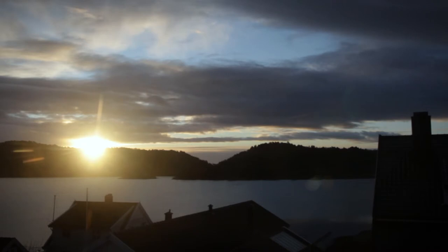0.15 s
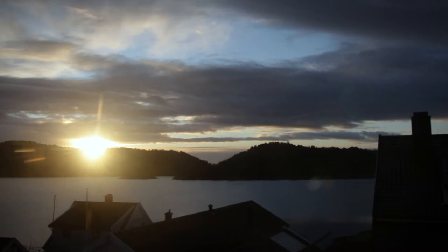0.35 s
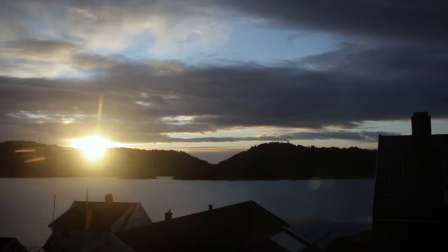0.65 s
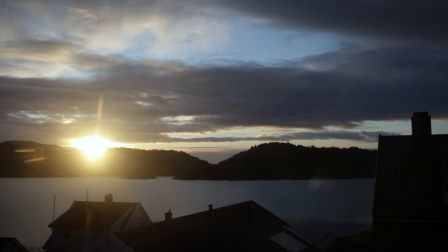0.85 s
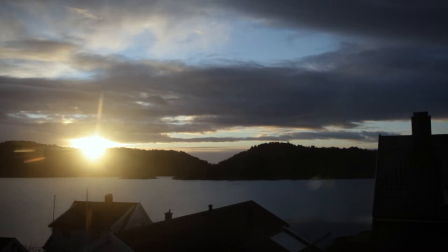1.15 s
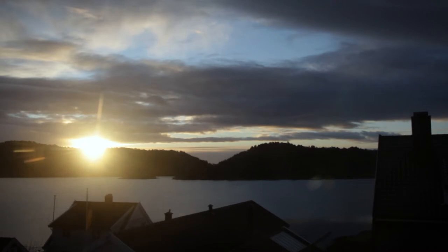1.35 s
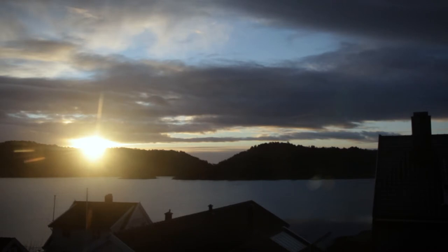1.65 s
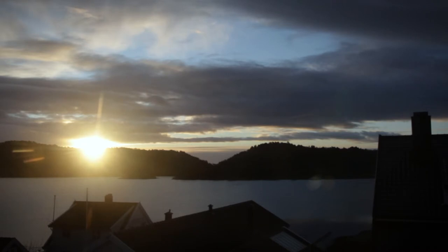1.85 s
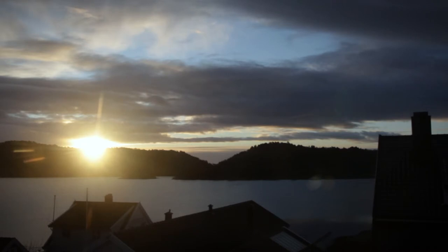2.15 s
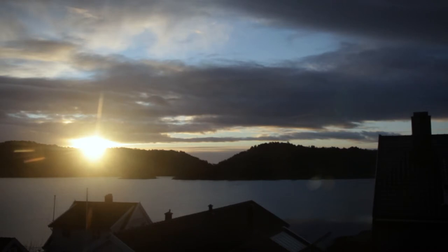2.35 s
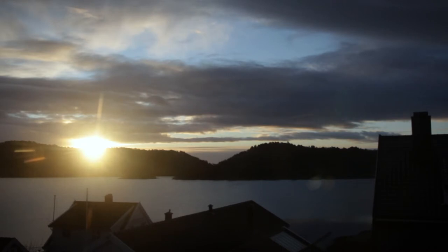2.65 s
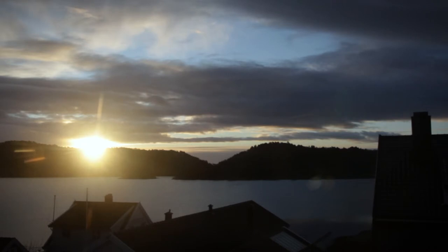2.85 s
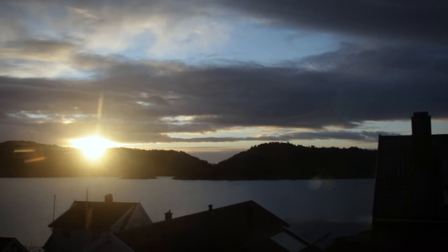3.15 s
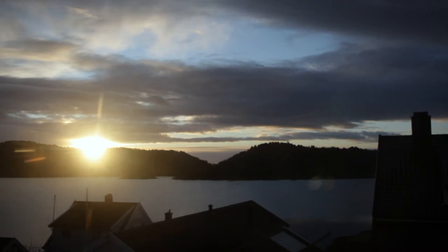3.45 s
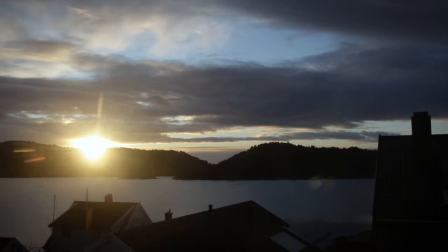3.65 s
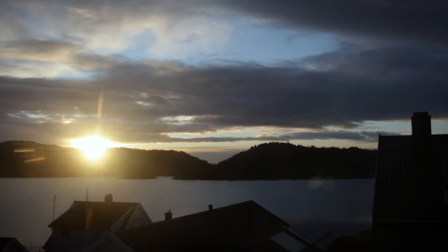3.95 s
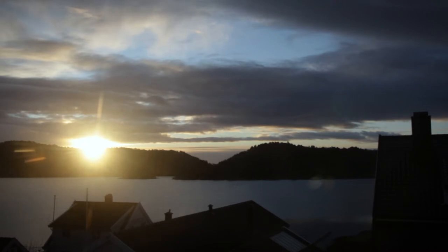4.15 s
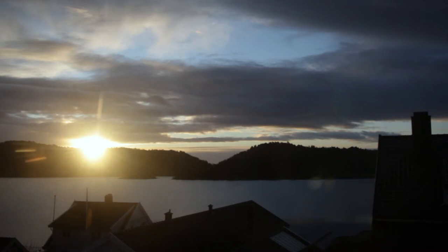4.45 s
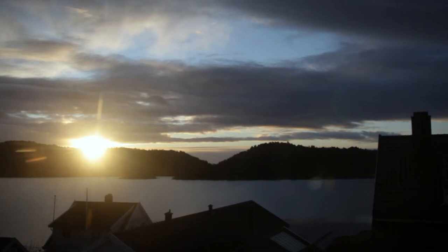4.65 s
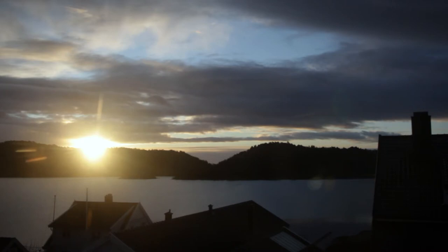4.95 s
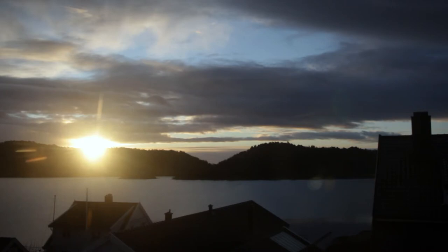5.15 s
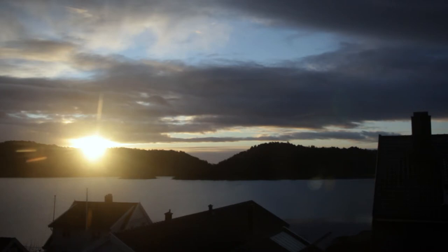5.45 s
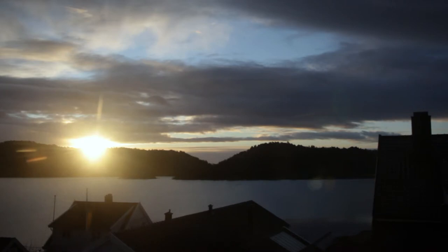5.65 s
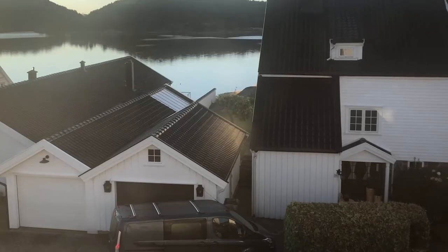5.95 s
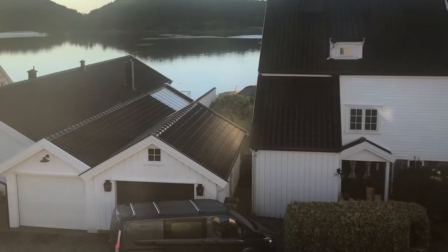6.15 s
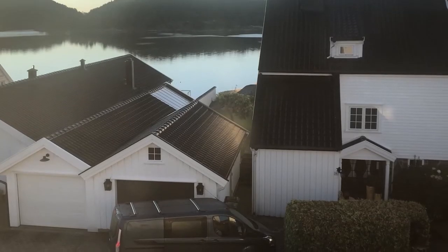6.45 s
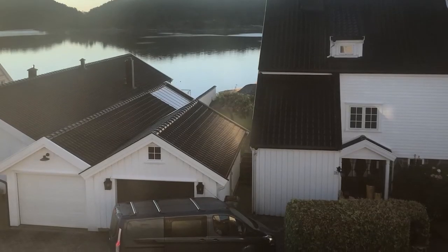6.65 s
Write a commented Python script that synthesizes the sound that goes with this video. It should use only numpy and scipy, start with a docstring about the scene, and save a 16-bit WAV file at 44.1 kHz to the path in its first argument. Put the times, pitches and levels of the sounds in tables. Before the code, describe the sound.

A microphone high above the houses picks up a flock of gulls, near and far, yelping hoarsely and clearly, mewing and wailing with street echoes. Beneath lie a soft low rumble and steady hiss. A couple of dull handling thumps come past the middle. After the cries fade, a starter bites and groans through four quick strokes, and the engine surges into a steady rattling idle until the end.

```python
"""A quiet harbour town, with a low rumble and an even hiss made of shaped noise, and a thin high tone.
A few soft knocks touch the microphone: short ticks of noise with quickly damped low tones.
Later a car below is started: it cranks four times, catches, flares and settles to a clattering idle,
made of ringing noise and low tones. Gulls yelp, wail and mew over the roofs, their cries echoing
between the houses; each voice is a stack of sine waves with a bending, shaky pitch."""
import sys
import numpy as np
from scipy import signal
from scipy.fft import rfft, irfft, next_fast_len
from scipy.io import wavfile

SR = 44100
rng = np.random.default_rng(int(sys.argv[2]) if len(sys.argv) > 2 else 0)


def output_pcm(signal):
    """Save a mono or channel-first signal as 16-bit PCM at the path in sys.argv[1].

    Samples are clipped to [-1, 1] before scaling.
    """
    pcm = np.clip(np.atleast_2d(signal).T, -1, 1) * 32767
    wavfile.write(sys.argv[1], SR, np.round(pcm).astype(np.int16))


N = 300321
T = np.arange(N) / SR   # time in seconds


def from_db(db):
    """Turn decibels into a gain."""
    return 10 ** (np.asarray(db) / 20)


def rms_one(x):
    """Scale a sound to an rms level of 1."""
    return x / np.sqrt(np.mean(x ** 2) + 1e-20)


def in_time(rows, t=T):
    """Draw straight lines between the rows of a table and read every column at the times t."""
    s, *columns = np.transpose(rows)
    return [np.interp(t, s, c) for c in columns]


def swell(t, start, end, attack, release):
    """Rise from 0 to 1 after the start, hold, and fall back to 0 by the end."""
    return np.clip((t - start) / attack, 0, 1) * np.clip((end - t) / release, 0, 1)


def gate(t, start, end, fade):
    """A swell whose rise and fall take equally long."""
    return swell(t, start, end, fade, fade)


def hump(middle, length):
    """One smooth rise and fall."""
    return np.cos(np.pi * np.clip((T - middle) / length, -.5, .5))


def dying(start, t60):
    """Jump to 1, then die away by 60 dB in t60 seconds."""
    return (T >= start) * from_db(-60 * np.clip((T - start) / t60, 0, 4))


def turns(hz):
    """Add up a changing frequency into a running phase in radians."""
    return 2 * np.pi * np.cumsum(hz) / SR


def drift(rate, size=N):
    """Smooth random wander of spread 1; a higher rate (Hz) wanders faster."""
    # worked out at every 16th sample, dropping the first 400 values while the filter settles
    r = np.exp(-32 * np.pi * rate / SR)
    white = rng.standard_normal(size // 16 + 402)
    slow = signal.lfilter([1], [1, -2 * r, r * r], white)[400:]
    return np.interp(np.arange(size) / 16, np.arange(len(slow)), rms_one(slow))


def noise(spectrum):
    """Noise coloured by a curve of frequency and dB, falling away past both ends; rms 1."""
    hz, db = np.transpose(spectrum)
    size = next_fast_len(N)
    f = np.arange(size // 2 + 1) * SR / size + 1   # the 1 avoids log(0)
    curve = from_db(np.interp(np.log(f), np.log(hz), db))
    ends = np.minimum(1, np.minimum(f / hz[0], hz[-1] / f)) ** 2
    white = rng.standard_normal(size)
    return rms_one(irfft(rfft(white) * curve * ends, size)[:N])


def resonate(x, modes):
    """Let x ring in several resonances side by side, with alternating sign; rms 1."""
    out = 0
    for k, (hz, width, db) in enumerate(modes):
        r = np.exp(-np.pi * width / SR)
        ring = signal.lfilter([1, 0, -1], [1, -2 * r * np.cos(2 * np.pi * hz / SR), r * r], x)
        out = out + (-1) ** k * from_db(db) * (1 - r * r) * ring
    return rms_one(out)


def houses(x, t60, gap, count=50, diffuse=0.015):
    """Sharp wall echoes over a soft noisy tail, both after a gap in seconds; unit energy."""
    t = np.arange(SR) / SR
    response = diffuse * rng.standard_normal(SR)
    response[rng.integers(0, SR // 2, count)] += rng.choice([-1, 1], count)
    response *= (t > gap) * from_db(-60 * t / t60)
    return signal.fftconvolve(x, response / np.linalg.norm(response))[:N]


# How the town and the air change. Each row: time in seconds, then rumble and hiss in dB
# before the lifts set in town().
TOWN_LEVELS = [(0, -54, -72), (2.33, -54.5, -73.5), (3.31, -56.5, -75), (4.15, -60, -77),
               (4.86, -63.5, -84), (5.2, -64, -83.5), (5.4, -60, -79)]
# Colour of the rumble. Each row: frequency in Hz, relative level in dB per Hz.
RUMBLE_COLOUR = [(15, -41), (25, -28.5), (60, -9.5), (102, -11), (189, 0.5), (220, -3.5), (253, 3),
                 (295, -6), (356, -8.5), (824, -18.5), (1030, -25), (1140, -23), (1500, -21.5),
                 (1950, -37.5), (3300, -120)]
# Colour of the hiss. Each row: frequency in Hz, relative level in dB per Hz.
AIR_COLOUR = [(500, 11), (1000, 10), (2000, 11), (4000, 5.5), (7000, 2), (10000, 0.5), (16000, -2.5)]
WHINE_HZ, WHINE_DB = 14700, -86   # thin high tone


def town(rumble_db=1, hiss_db=10, lumpy_db=1.5):
    """Far traffic and boats: unsteady low noise, under an even hiss. Apart from them, a narrow band rings as a
    thin high tone."""
    rumble, hiss = in_time(TOWN_LEVELS)
    low = from_db(rumble + rumble_db + lumpy_db * drift(8.5)) * noise(RUMBLE_COLOUR)
    air = from_db(hiss + hiss_db) * noise(AIR_COLOUR)
    tone = from_db(WHINE_DB) * resonate(rng.standard_normal(N), [(WHINE_HZ, 60, 0)])
    return low + air + tone


# Knocks on the microphone. Each row: start in seconds, thud level in dB, thud pitch in Hz,
# thud decay by 60 dB in seconds, tick level in dB.
KNOCKS = [(1.06, -68, 300, 0.012, -43), (3.553, -34, 330, 0.012, -63), (3.560, -24.5, 650, 0.0073, -52),
          (3.649, -19.5, 394, 0.0085, -53.5), (5.287, -45.5, 800, 0.024, -64), (5.296, -42, 136, 0.11, -80),
          (5.313, -37.5, 182, 0.041, -80)]


def knocks(tick_t60=0.005, rise=0.0029):
    """A light tick of noise and a low thud that swells in about 3 ms and is quickly damped."""
    tick_noise = noise([(800, -17), (3000, 0), (6000, 1), (12000, -12)])
    out = np.zeros(N)
    for start, db, hz, t60, tick_db in KNOCKS:
        envelope = dying(start, t60) * gate(T, start, np.inf, rise)
        out += from_db(db) * envelope * np.sin(2 * np.pi * hz * (T - start))
        out += from_db(tick_db) * dying(start, tick_t60) * tick_noise
    return out


# Bites of the starter gear. Each row: start in seconds, decay by 60 dB in seconds,
# crunch level in dB, high scrape level in dB.
GEAR_BITES = [(5.499, 0.25, -39.5, -61), (5.527, 0.079, -40, -62), (5.66, 0.19, -50, -58),
              (5.692, 0.077, -53, -59), (5.96, 0.71, -50.5, -83), (6.029, 0.32, -51, -66),
              (6.099, 0.44, -45, -61)]
# Colour of the crunch. Each row: frequency in Hz, relative level in dB per Hz.
CRUNCH_COLOUR = [(300, -26), (800, -5), (1500, -3), (1900, -10), (2800, -2), (4500, -7), (7000, -16),
                 (10000, -34), (16000, -37)]
# The whirring pinion (small gear). Each row: time in seconds,
# tooth rate in Hz when no stroke slows it, level in dB.
PINION = [(5.57, 3140, -69), (5.66, 3800, -53), (5.91, 3820, -55), (6.0, 4840, -63), (6.029, 4950, -46),
          (6.08, 4970, -55), (6.14, 4880, -51), (6.22, 4450, -75)]
# Compression strokes. Each row: middle in seconds, length in seconds,
# level in dB before the groan setting of starter().
STROKES = [(5.599, .14, -45), (5.766, .09, -38), (5.878, .09, -36), (5.996, .09, -35)]
# Rings of the starter housing. Each row: frequency in Hz, width in Hz, relative level in dB.
HOUSING = [(278, 52, -12.5), (448, 220, -14), (830, 103, -8.5), (965, 31, 4.5), (1113, 118, -3.5),
           (1226, 100, -5.5), (1420, 120, -12), (3040, 930, -25.5)]
BITE_ATTACK_S, STROKE_ATTACK_S, STROKE_RELEASE_S = 0.0049, 0.013, 0.035
PINION_SAG = .09   # share of its speed that the pinion loses at the height of a stroke


def starter(whir_width_hz=300, groan_db=-4, lag_s=0.0118):
    """The pinion bites and whirs roughly; each stroke slows it and makes the housing groan."""
    crunch, scrape = noise(CRUNCH_COLOUR), noise([(5000, 0), (16000, 0)])
    bites = np.zeros(N)
    for start, t60, db, scrape_db in GEAR_BITES:
        envelope = dying(start, t60) * gate(T, start, np.inf, BITE_ATTACK_S)
        bites += envelope * (from_db(db) * crunch + from_db(scrape_db) * scrape)

    load = np.zeros(N)
    slowing = np.zeros(N)
    for middle, length, db in STROKES:
        start, end = middle - length / 2, middle + length / 2
        load += from_db(db) * swell(T, start, end, STROKE_ATTACK_S, STROKE_RELEASE_S)
        slowing += hump(middle + lag_s, length) ** 2   # the speed dips a little after the push

    tooth_hz, db = in_time(PINION)
    phase = turns(tooth_hz * (1 - PINION_SAG * slowing))
    # two random waves on one tone blur it into a rough whir
    teeth = drift(whir_width_hz) * np.sin(phase) + drift(whir_width_hz) * np.cos(phase)
    whir = from_db(db) * rms_one(teeth) * gate(T, PINION[0][0], PINION[-1][0], .02)
    groan = from_db(groan_db) * load * resonate(rng.standard_normal(N), HOUSING)
    return bites + whir + groan


# Engine speed. Each row: time in seconds, firings per second.
SPEED = [(6.02, 51), (6.2, 62), (6.33, 61.5), (6.81, 71)]
# Tones above the firing rate. Each row: multiple of the firing rate, relative level in dB.
OVERTONES = [(1.501, -9), (1.999, -3), (2.5, -3.5), (3.5, -6), (3.9, -2.5), (4.4, -8)]
# Rings of the engine block. Each row: frequency in Hz, width in Hz, relative level in dB.
BLOCK_RINGS = [(836, 56, -5.5), (905, 7.9, -2.5), (959, 6, 7), (1023, 35, -3), (1095, 13, 2),
               (1190, 16, -4), (1300, 40, -13.5), (1412, 51, -9), (1640, 150, -13)]
# Rings of the exhaust. Each row: frequency in Hz, width in Hz, relative level in dB.
EXHAUST_RINGS = [(139, 120, -3), (256, 44, 0), (377, 93, -4.5), (470.3, 16.6, 7), (590, 22, 0)]
# Colour of the valve gear's rasp. Each row: frequency in Hz, relative level in dB per Hz.
RASP_COLOUR = [(600, -4), (1000, 0), (1600, -14), (2000, -5), (3000, -8.5), (4000, -14), (5000, -9.5),
               (6300, -19.5), (8000, -30), (11000, -54), (16000, -37)]
# Rings of the valve gear's metal. Each row: frequency in Hz, width in Hz, relative level in dB.
METAL_RINGS = [(2140, 67, 2), (3476, 180, 5.5), (4370, 67, -2), (4870, 87, 3), (7220, 240, -12),
               (9050, 230, -8.5), (12800, 260, -22.5), (15050, 220, -17)]
# Levels of the engine's parts. Each holds: level in dB while cranking, in the flare, and at idle.
BLOCK_DB = (-49.5, -55, -48)
GEARS_DB = (-54, -57.5, -55.5)
EXHAUST_DB = (-62.5, -55, -54.5)
FIRING_TONE_DB = (-100, -45, -62)
OVERTONES_DB = (-100, -55, -54)
KEY_S, CATCH_S = 5.5, 6.1   # the starter engages; the engine catches
# the rich surge as it catches
FLARE_START_S, FLARE_END_S, FLARE_ATTACK_S, FLARE_RELEASE_S = 6.03, 6.42, 0.18, 0.094
BARK_S, BARK_LENGTH_S, BARK_DB = 6.163, 0.067, -43.5   # first full firing out of the exhaust


def engine(metal_db=-5, clatter=0.11, wobble=0.0124, catch_fade_s=0.11):
    """Noise pulsing at twice the firing rate rings block, valve gear and exhaust, over low tones."""
    running = np.clip((T - CATCH_S) / catch_fade_s + .5, 0, 1)
    flare = swell(T, FLARE_START_S, FLARE_END_S, FLARE_ATTACK_S, FLARE_RELEASE_S)

    def level(part_db):
        """Cranking fades into idle, and the flare joins in by power."""
        crank, surge, idle = from_db(part_db)
        return crank * (1 - running) + np.hypot(surge * flare, idle * running)

    firing_hz, = in_time(SPEED)
    phase = turns(firing_hz * (1 + wobble * drift(12.8)))
    beat = 1 + clatter * (np.cos(2 * phase) + drift(110))
    shake = beat * rng.standard_normal((3, N))

    bark = from_db(BARK_DB) * hump(BARK_S, BARK_LENGTH_S) ** 2
    block = level(BLOCK_DB) * resonate(shake[0], BLOCK_RINGS)
    exhaust = np.hypot(level(EXHAUST_DB), bark) * resonate(shake[1], EXHAUST_RINGS)
    rasp = rms_one(beat * noise(RASP_COLOUR))
    metal = from_db(metal_db) * resonate(shake[2], METAL_RINGS)
    gears = level(GEARS_DB) * (rasp + metal)

    firing_tone = level(FIRING_TONE_DB) * np.sin(phase)
    hum = np.zeros(N)
    for multiple, db in OVERTONES:
        hum += from_db(db + 2 * drift(9.3)) * np.sin(multiple * phase + rng.uniform(0, 2 * np.pi))
    overtones = level(OVERTONES_DB) * hum
    return (block + exhaust + gears + firing_tone + overtones) * gate(T, KEY_S, np.inf, 0.0064)


# The rest of the flock, farther off. Each row: time in seconds, level of a cry in dB.
FLOCK_LEVELS = [(0, -71), (.5, -91), (.8, -64), (1.0, -88), (1.6, -60.5), (2.35, -85), (3.15, -68.5),
                (3.5, -81), (4.1, -67.5), (5.2, -75)]


def far_flock(count=70, low_hz=880, high_hz=1180, length=.14, hoarse=0.453):
    """Make rows like those of YELPS for distant birds, each at its own moment, pitch and hoarseness."""
    chance = rng.random((count, 3))
    middles = (np.arange(count) + chance[:, 0]) / count * FLOCK_LEVELS[-1][0]
    levels, = in_time(FLOCK_LEVELS, middles)
    return [(middle, length, low_hz + pitch * (high_hz - low_hz), db, 0, hoarse + (1 - hoarse) * rasp)
            for middle, db, (_, pitch, rasp) in zip(middles, levels, chance)]


# Harmonics of wails and mews. Each row: harmonic number, level in dB in the low voice,
# level in dB in the pure voice.
LONG_VOICE = [(1, -1, -29), (2, -4.5, -2), (3, -7.5, -40), (4, -16.5, -13.5), (5, -24.5, -55),
              (6, -34, -23)]
ROUGH_BELOW_HZ = 1470   # under this pitch a long cry grows unsteady


def long_voice(hz, pure, bright_db, jitter=0.0019, low_jitter=0.0051, flutter_db=3.5,
               fading_db=2.0, wander=0.00301):
    """Drawn-out gull voice; when pure, odd harmonics drop out and it rings an octave higher."""
    size = len(hz)
    unsteady = jitter + low_jitter * np.clip((ROUGH_BELOW_HZ - hz) / 100, 0, 1)
    phase = turns(hz * (1 + unsteady * drift(136, size) + wander * drift(11.5, size)))
    voice = np.zeros(size)
    for k, low, high in LONG_VOICE:
        db = low + pure * (high - low) + bright_db * (k > 3)
        flutter = flutter_db * drift(43, size) + fading_db * drift(8, size)
        voice += from_db(db + flutter) * np.sin(k * phase)
    return voice


# Thin pure mews. Each row: start, top and end in seconds, then first, top and last pitch in Hz
# (of the first harmonic), level in dB, and a change in dB for harmonics above the third.
MEWS = [(-.06, 0, .06, 1170, 1190, 1187, -55, -12), (0.738, 0.788, .86, 1567, 1610, 1590, -52.5, -14),
        (.84, 0.875, .99, 1556, 1521, 1478, -52, -12), (1.256, 1.355, 1.41, 1580, 1692, 1700, -54, -15),
        (1.3, 1.36, 1.45, 1240, 1278, 1230, -57, -7), (2.623, 2.683, 2.8, 1270, 1289, 1275, -56, -10),
        (3.475, 3.87, 4.18, 1315, 1488, 1465, -50.5, 0.5),
        (4.509, 4.682, 4.82, 1510, 1665, 1400, -52.5, -9), (4.558, 4.69, 4.86, 1282, 1454, 1170, -53, -8.5),
        (4.799, 4.831, 4.97, 1217, 1200, 1090, -56.5, -4),
        (4.954, 5.005, 5.09, 1290, 1440, 1167, -59.5, -8), (5.33, 5.382, 5.42, 1320, 1425, 1290, -64, -6)]
# bend of the pitch up to the top; longer mews bend more and so stay longer near the top note
MEW_ARCH, MEW_FLATTER_PER_S = 1.3, 4.2
MEW_FALL_POWER = 1.8   # bend of the pitch after the top
MEW_ATTACK_S, MEW_RELEASE_S = 0.028, 0.048


def mews():
    """A mew stays in the pure voice and glides in one bend through its middle pitch."""
    out = np.zeros(N)
    for start, top, end, first_hz, top_hz, last_hz, db, bright_db in MEWS:
        span = (T > start) & (T < end)
        t = T[span]
        bend = np.where(t < top, MEW_ARCH + MEW_FLATTER_PER_S * (end - start), MEW_FALL_POWER)
        off_top = np.interp(t, [start, top, end], [1, 0, 1]) ** bend
        hz = top_hz + off_top * (np.where(t < top, first_hz, last_hz) - top_hz)
        envelope = swell(t, start, end, MEW_ATTACK_S, MEW_RELEASE_S)
        out[span] += long_voice(hz, 1, bright_db) * envelope * from_db(db)
    return out


# Long wails. Each row: start, break up, break down and end in seconds, then the pitch before
# the break and the final pitch in Hz (of the first harmonic), and level in dB.
WAILS = [(2.476, 2.607, 2.91, 3.39, 1430, 1307, -53.5), (3.714, 3.835, 4.125, 4.43, 1526, 1262, -55.5)]
# first-harmonic pitch at the onset, on the pure note, and just after breaking back
WAIL_START_HZ, WAIL_TOP_HZ, WAIL_DROP_HZ = 1328, 1713, 1560
BREAK_S, SETTLE_S = 0.048, .03   # time a break takes; time constant of settling on the pure note
FALL_POWER = 1.35   # bend of the final fall


def wails(attack_s=0.027, release_s=0.042, pure_db=0):
    """A wail climbs, breaks up to a held pure note, breaks back and sinks."""
    out = np.zeros(N)
    for start, up, down, end, break_hz, end_hz, db in WAILS:
        span = (T > start) & (T < end)
        t = T[span]
        pure = gate(t, up - BREAK_S / 2, down + BREAK_S / 2, BREAK_S)
        climb = np.interp(t, [start, up], [WAIL_START_HZ, break_hz])
        fallen = np.clip((t - down) / (end - down), 0, 1) ** FALL_POWER
        fall = WAIL_DROP_HZ + (end_hz - WAIL_DROP_HZ) * fallen
        low = np.where(t < (up + down) / 2, climb, fall)
        # the pure note starts halfway up and settles on its top pitch
        still_to_go = np.exp(-np.maximum(t - up, 0) / SETTLE_S)
        high = WAIL_TOP_HZ - (WAIL_TOP_HZ - break_hz) / 2 * still_to_go
        voice = long_voice(low + pure * (high - low), pure, 0)
        out[span] += voice * swell(t, start, end, attack_s, release_s) * from_db(db + pure_db * pure)
    return out


# Short arched cries. Each row: middle in seconds, length in seconds, top pitch in Hz, level in dB,
# treble tilt in dB per octave, hoarseness (0 is clear, 1 is hoarse).
YELPS = [(.042, 0.25, 1050, -66, 2, 1.02), (.068, .1, 773, -62, -3, 0.37), (.155, .12, 1048, -53, -5.5, 0),
         (.378, 0.12, 787, -64, 4.5, 0.36), (.644, 0.11, 1026, -49.5, -2, 0.1),
         (.786, .15, 1078, -54.5, .5, 0.85), (1.15, 0.11, 1029, -53, -1, 0.73),
         (1.201, 0.18, 745, -64, 7.5, 0.54), (1.31, 0.12, 1115, -53.5, 2.5, 0.72),
         (1.456, 0.16, 1090, -53.5, -0.5, 0.73), (1.481, 0.15, 1014, -62, 3.5, 0.94),
         (1.596, 0.16, 1046, -57, 2, 0.9), (1.691, 0.11, 1084, -55, 2.5, 0.71),
         (1.694, 0.087, 984, -61, 2, .55), (1.823, .11, 1018, -56, -1, 0.88),
         (1.839, .11, 1097, -59, 1, .7), (1.933, .13, 1061, -47.5, -1.5, 0.08),
         (2.079, 0.15, 1112, -61, 0, 0.73), (2.478, 0.057, 881, -60.5, -0.5, 0.1),
         (2.649, .12, 1085, -51, -2.5, 0.29), (3.143, .14, 944, -56.5, 4, 0.53),
         (3.475, 0.15, 1058, -65, -9.5, 0.92), (3.763, 0.1, 1011, -61, 1, 0.52),
         (3.93, 0.15, 1060, -57, -2, 0.16), (4.51, .12, 1226, -61, -7, 0.94),
         (4.556, .13, 1050, -59.5, 3, 0.05), (4.668, 0.11, 1316, -52, -0.5, 0.02),
         (4.718, .15, 1147, -59, -6.5, 0.14), (5.088, .115, 1064, -61, 1.5, 0.22),
         (5.235, .14, 1086, -69, -2, 0.09), (5.402, 0.13, 998, -68.5, -2, .3)]
# Harmonics of a yelp. Each row: harmonic number, level in dB when clear, level in dB when hoarse.
YELP_VOICE = [(1, -9.5, -3.5), (2, 5, -3.5), (3, -9, 2.5), (4, -8.5, -7), (5, -6, -21.5), (6, -11, -23),
              (7, -21.5, -43), (8, -46, -36)]
# share of its pitch that a yelp loses towards its ends, for a top pitch of USUAL_HZ
CLEAR_DROOP, HOARSE_DROOP, USUAL_HZ = .25, 0.091, 1049
# share of a cry that comes by the walls: NEAR_ECHO at NEAR_DB, less by 0.4 for each dB below that;
# every cry here is faint enough for the share to be 0, so all come straight
NEAR_DB, NEAR_ECHO, ECHO_PER_DB = -45.5, 0.55, -0.4


def yelps(cries, jitter=0.0033, hoarse_jitter=0.02, flutter_db=2.5, hoarse_db=3.5,
          colour_db=1.17, edge=0.53, sag=0.301):
    """A yelp arches up and sags at its end; hoarse ones are flatter and shake in pitch and level."""
    direct, scattered = np.zeros((2, N))
    for middle, length, top_hz, db, tilt_db, hoarse in cries:
        span = np.abs(T - middle) < length / 2
        u = (T[span] - middle) / (length / 2)   # runs from -1 to 1 through the cry
        size = len(u)
        droop = (CLEAR_DROOP + hoarse * (HOARSE_DROOP - CLEAR_DROOP)) * top_hz / USUAL_HZ
        arch = 1 - droop * u * u * (1 + sag * u)
        shake = jitter * drift(132, size) + hoarse * hoarse_jitter * drift(243, size)
        phase = turns(top_hz * arch * (1 + shake))

        voice = np.zeros(size)
        for k, clear, harsh in YELP_VOICE:
            colour = tilt_db * np.log2(k / 2) + colour_db * rng.standard_normal()
            voice += from_db(clear + hoarse * (harsh - clear) + colour) * np.sin(k * phase)

        flutter = flutter_db * drift(50, size) + hoarse * hoarse_db * drift(270, size)
        cry = voice * gate(u, -0.96, 0.99, edge) * from_db(db + flutter)
        echo = np.clip(NEAR_ECHO + ECHO_PER_DB * (NEAR_DB - db), 0, 1)
        direct[span] += np.sqrt(1 - echo ** 2) * cry
        scattered[span] += echo * cry
    return direct + houses(scattered, t60=0.046, gap=0.0012)


def scene(echo_db=-9, roofs_db=-11, air_cut_hz=9000):
    """Town, knocks and car, with gulls dulled by the air, echoing off near roofs and down the streets."""
    gulls = yelps(YELPS + far_flock()) + wails() + mews()
    air_filter = signal.butter(6, air_cut_hz, fs=SR, output="sos")
    gulls = signal.sosfilt(air_filter, gulls + 1e-18)   # the tiny offset avoids slow near-zero sums
    roofs = from_db(roofs_db) * houses(gulls, t60=0.12, gap=0.0063)
    streets = from_db(echo_db) * houses(gulls, t60=0.68, gap=0.02)
    return (town() + knocks() + starter() + engine() + gulls + roofs + streets)[None]


CUTOFF_HZ = 15900


def record(dry):
    """Cut the top steeply with a low-pass filter."""
    return signal.sosfilt(signal.ellip(12, .1, 70, CUTOFF_HZ, fs=SR, output="sos"), dry)


dry = scene()
out = record(dry)
output_pcm(out)
```